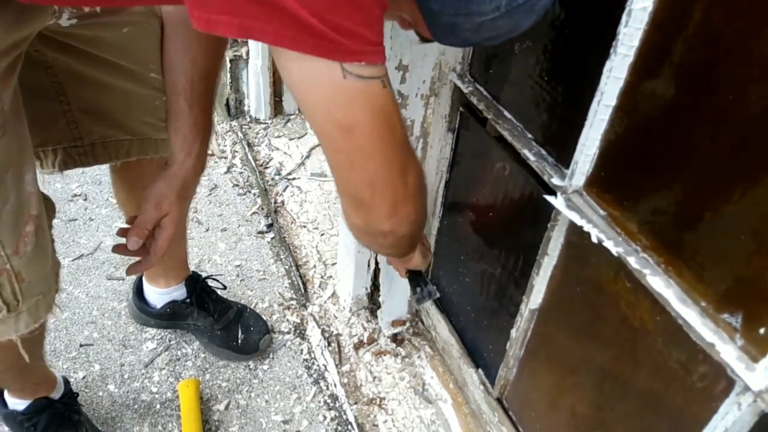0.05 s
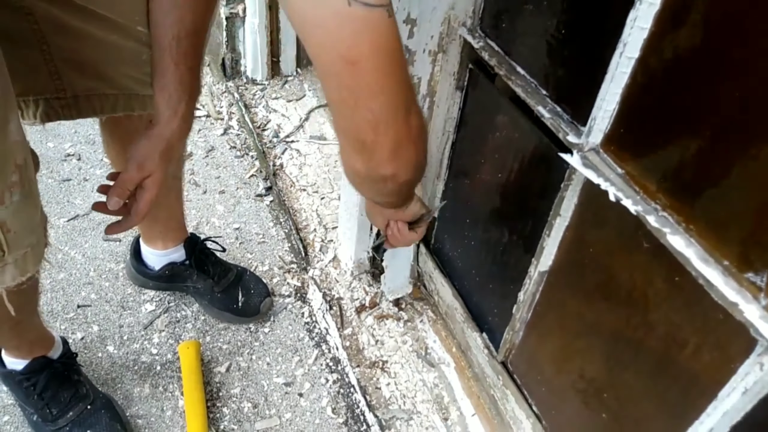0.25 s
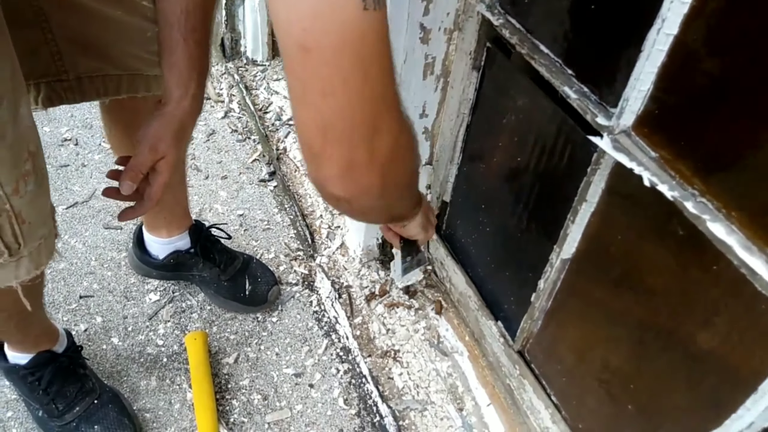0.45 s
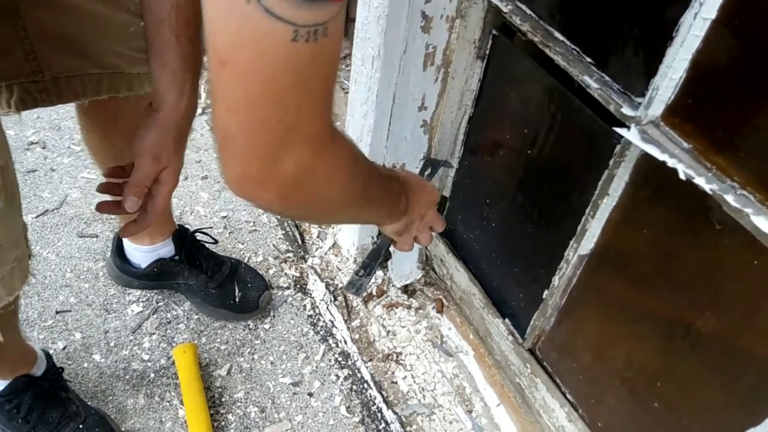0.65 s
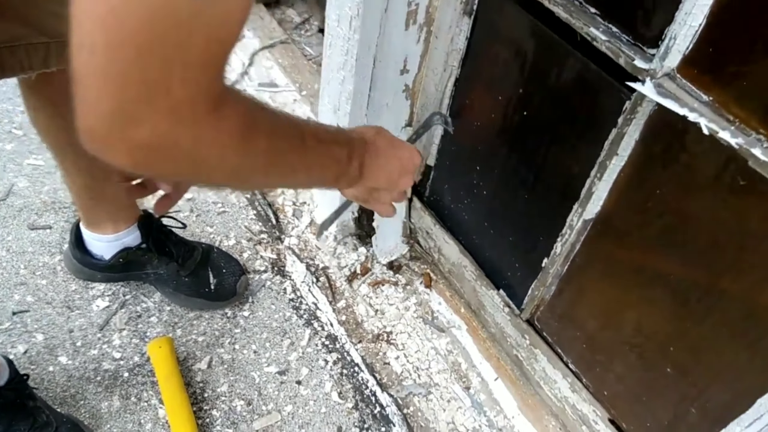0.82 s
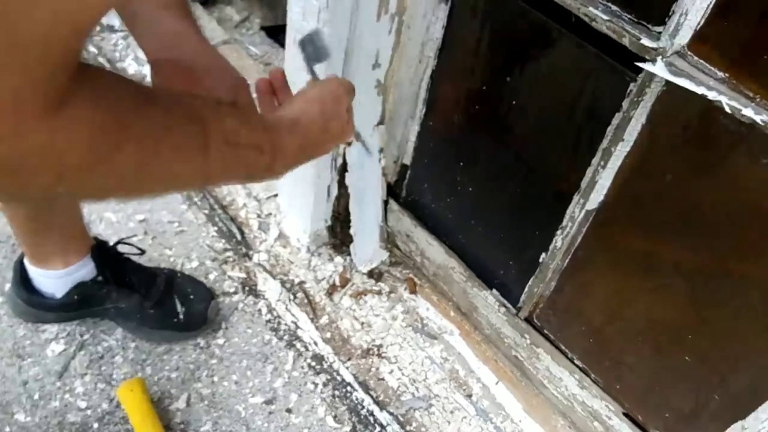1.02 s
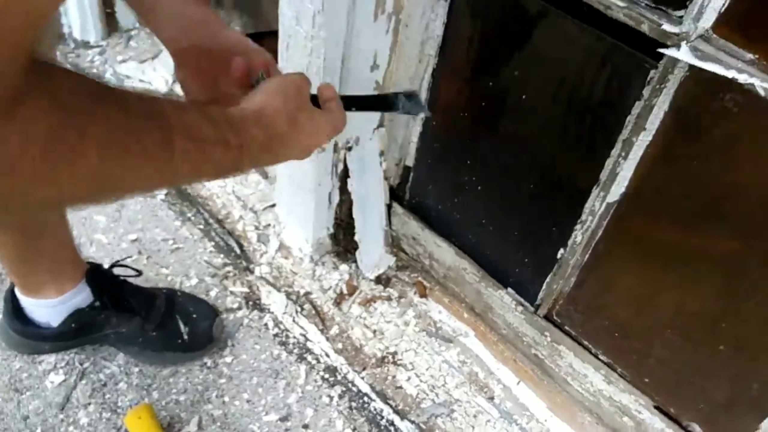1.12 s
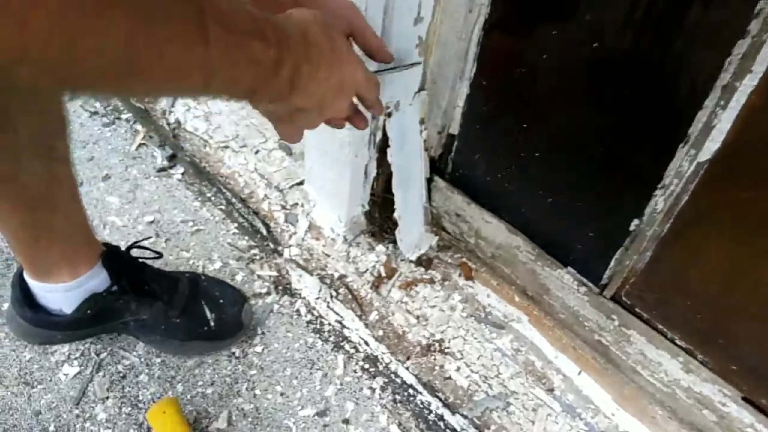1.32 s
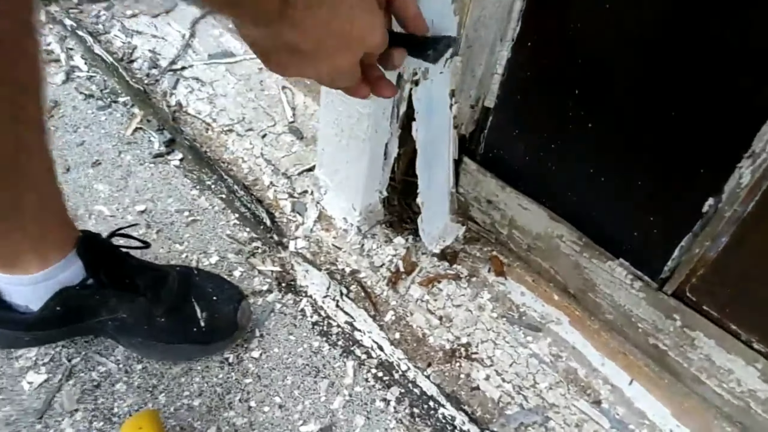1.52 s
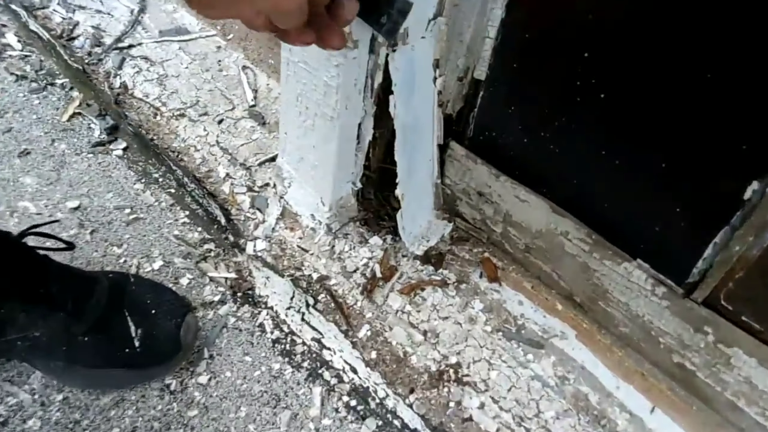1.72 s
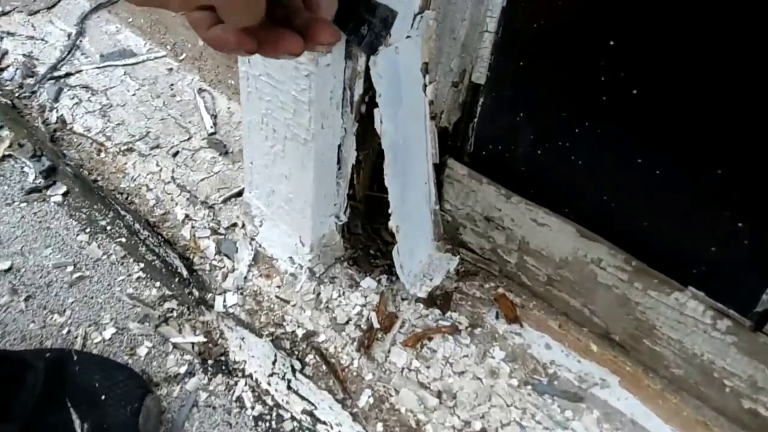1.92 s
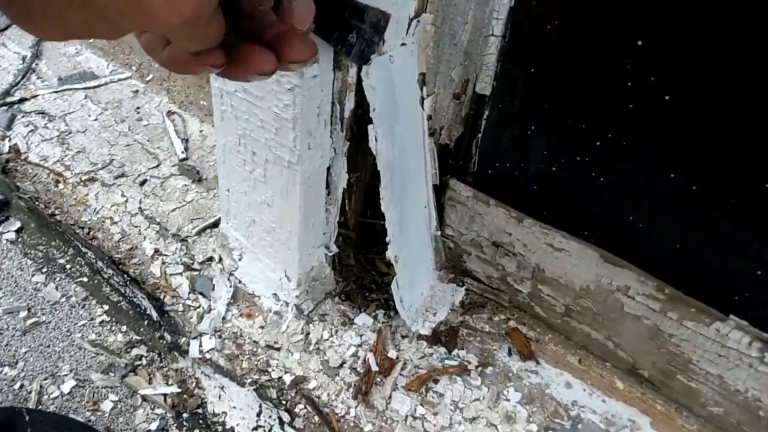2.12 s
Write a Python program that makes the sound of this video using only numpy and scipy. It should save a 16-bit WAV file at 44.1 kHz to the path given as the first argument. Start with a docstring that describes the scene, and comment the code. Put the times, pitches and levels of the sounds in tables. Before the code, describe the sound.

Close, fairly dry outdoor prying of old wood trim; it splinters sharply early on, chips tick and feet thump softly on concrete, later the frame is knocked, the blade clinks and judders briefly, over faint low air noise.

```python
"""Prying trim off an old window

A steel blade pries rotted wood off a window frame, close by, outdoors: it crumbles, then cracks sharply.
Flakes tick, shoes shuffle on concrete, the frame is knocked; the blade clinks, then judders with a short rasp.
Fading sine waves make wood and steel ring; shaped noise and random grains make the rest."""
import sys
import numpy as np
from scipy import signal
from scipy.io import wavfile

SR = 44100
rng = np.random.default_rng(int(sys.argv[2]) if len(sys.argv) > 2 else 0)


def master_out(mix):
    """Clip the mix to full scale and print it as 16-bit PCM to the path in sys.argv[1]."""
    frames = np.transpose(np.atleast_2d(mix))
    ceiling = np.clip(frames, -1, 1)
    pcm = np.round(ceiling * 32767).astype(np.int16)
    wavfile.write(sys.argv[1], SR, pcm)


N = 94815  # length in samples


def amp(db):
    """Turns decibels into a gain."""
    return 10 ** (np.asarray(db) / 20)


def unit(x):
    """Scales a sound to an rms level of 1."""
    return x / np.sqrt(np.mean(x ** 2) + 1e-20)


def seconds(length):
    """Gives the sample times of a stretch that lasts this many seconds."""
    return np.arange(int(length * SR)) / SR


def add(mix, s, sound):
    """Mixes a sound in at time s, cut off at the end of the mix."""
    start = max(round(s * SR), 0)
    part = mix[start:][:len(sound)]
    part += sound[:len(part)]


def curve(points):
    """Gain over the whole scene, drawn through (t/s, level/dB) points."""
    return amp(np.interp(np.arange(N) / SR, *np.transpose(points)))


def band(x, lo_hz, hi_hz, order=2):
    """Keeps only the sound between two frequencies."""
    edges = [lo_hz, min(hi_hz, SR / 2 - 1)]
    return signal.sosfilt(signal.butter(order, edges, "band", fs=SR, output="sos"), x)


def colour(x, points, size=2048):
    """Filters to a drawn spectrum, with energy 1 and no sound ahead of its cause (minimum phase)."""
    hz, db = np.transpose(points)
    log_bins = np.log(abs(np.fft.fftfreq(size, 1 / SR)) + 1)
    log_gain = np.log(amp(np.interp(log_bins, np.log(hz), db)))
    spectrum = np.exp(np.conj(signal.hilbert(log_gain)))
    taps = np.fft.ifft(spectrum).real[:size // 2]
    return signal.fftconvolve(x, taps / np.linalg.norm(taps))[:len(x)]


def fade(t, t60):
    """Exponential decay that drops 60 dB in t60 seconds."""
    return np.exp(-np.log(1000) * t / t60)


def onset(rise_s):
    """A short ramp that softens the start of a ring."""
    return np.minimum(seconds(.5) / rise_s, 1)


def ring(modes):
    """A struck body rings as a sum of dying sine waves, with alternating signs."""
    t = seconds(.5)
    out = 0
    for k, (hz, db, t60) in enumerate(modes):
        out = out + (-1) ** k * amp(db) * fade(t, t60) * np.sin(2 * np.pi * hz * t)
    return out


def blows(rows, spectrum, t60):
    """Each blow sheds a quick burst of noise."""
    out, t = np.zeros(N), seconds(.3)
    for s, db in rows:
        burst = rng.standard_normal(len(t)) * fade(t, t60)
        add(out, s, amp(db) * colour(burst, spectrum))
    return out


# outdoor background: [f/Hz, level/dB per Hz]
AIR = [(20, -62), (45, 1), (70, 0), (130, 3), (280, 1), (400, -4.5), (800, -8), (1700, -9.5), (3000, -16),
       (5000, -21), (7200, -21.5), (9500, -32), (15500, -28.5)]
AIR_DB, HUM_DB, HUM_HZ = -48.5, -58, 244


def air():
    """Steady noise makes the outdoor wash; a very narrow band of noise makes a faint wavering hum."""
    wash = unit(colour(rng.standard_normal(N), AIR))
    hum = unit(band(rng.standard_normal(N), HUM_HZ - 4, HUM_HZ + 4))
    return amp(AIR_DB) * wash + amp(HUM_DB) * hum


# low rumble as the stance shifts: [t/s, level/dB]
RUMBLE_LEVEL = [(.3, -54), (.55, -51), (.68, -49.5), (.75, -49), (.85, -43), (.91, -45.5), (.99, -51),
                (1.3, -64)]
# colour of the rumble: [f/Hz, level/dB per Hz]
RUMBLE = [(25, -26), (55, 1), (110, -1.5), (170, -2), (260, -7.5), (400, -22.5), (1500, -54)]


def shuffle():
    """A lumpy low rumble swells as the weight moves from foot to foot."""
    return curve(RUMBLE_LEVEL) * unit(colour(rng.standard_normal(N), RUMBLE))


# pressure of the crumbling and scuffing: [t/s, level/dB]
CRUMBLE = [(0, -55), (.05, -45), (.075, -40.5), (.115, -42), (.17, -49.5), (.23, -71), (.44, -47.5),
           (.58, -61.5), (.8, -52), (.93, -46.5), (1.09, -44), (1.2, -55), (1.53, -57), (1.62, -42.5),
           (1.85, -46), (1.98, -49), (2.05, -44), (2.15, -47.5)]
# colour of the crumbs: [f/Hz, level/dB per Hz]
CRUMBS = [(200, -12), (600, -1), (900, 2.5), (1250, -6), (1800, 3.5), (3200, -5), (5000, -9), (7400, -1.5),
          (9500, -13), (15500, -23.5)]
CRUMBS_PER_S, CRUMB_SPREAD_DB = 2500, 3


def crumbs():
    """Dense tiny fractures and grit, as random single-sample grains, follow the pressure."""
    size = amp(CRUMB_SPREAD_DB * np.minimum(rng.exponential(1, N), 4)) * rng.choice([-1, 1], N)
    grains = size * (rng.random(N) < CRUMBS_PER_S / SR)
    return curve(CRUMBLE) * unit(colour(grains, CRUMBS))


# flakes and chips that tick: [t/s, level/dB, low band/dB, middle band/dB, high band/dB]
TICKS = [(0.0138, -27, -9, -12, -4.5), (0.0525, -27, -5.5, -11, -10), (0.0698, -27.5, -9, -10, -2.5),
         (0.074, -27.5, -6, -7, -10), (0.0908, -32, -4, -20, -19), (0.112, -21, -4, -31, -9.5),
         (.1200, -29.5, -4, -8, -17), (.2970, -28.5, -2.5, -20, -23), (0.326, -31.5, -1.5, -24, -22),
         (0.4256, -18, -8, -8.5, -7.5), (0.5342, -34.5, 0.5, -13, -14), (.613, -34, -12, -11.5, -1),
         (0.7062, -24, -18, -18, -3), (0.7954, -35, -3.5, -8, -16), (.836, -35, -10, -9, -4),
         (.9170, -29.5, -4.5, -4, -9), (1.4138, -28, -1, -8, -9.5), (1.4240, -25.5, -3, -12, -14),
         (1.5046, -25.5, -3.5, -11.5, -10), (1.566, -31.5, -15, -10, -10), (1.5823, -24, -8.5, -7.5, -7),
         (1.5957, -27, -1, -10, -8), (1.665, -21, -8, -9, -2), (1.9170, -22, -19, -7.5, -9.5)]
# low, middle and high band of a tick: [from f/Hz, to f/Hz]
TICK_BANDS = [(1000, 2520), (2500, 4700), (5500, 8050)]
TICK_DB, TICK_T60, TICK_RISE_S = -1, 0.016, 0.00043
# ring of larger chips that land: [f/Hz, level/dB, t60/s]
PIP = [(1076, -40, 0.054), (1435, -35, .025), (1690, -32.5, 0.048)]
# when they land: [t/s]
PIP_S = [.444, 2.0005]


def ticks():
    """Chips of paint and wood snap and land as short noises, each with its own mix of three bands."""
    out, t = np.zeros(N), seconds(0.12)
    shape = np.minimum(t / TICK_RISE_S, 1) * fade(t, TICK_T60)
    for s, db, *shares in TICKS:
        tick = 0
        for share, edges in zip(shares, TICK_BANDS):
            tick = tick + amp(share) * unit(band(rng.standard_normal(len(t)), *edges))
        add(out, s, amp(db + TICK_DB) * shape * tick)
    for s in PIP_S:
        add(out, s, onset(TICK_RISE_S) * ring(PIP))
    return out


# fibres that part in the crack: [t/s, level/dB]
SNAPS = [(0.2363, 2), (.2376, -0.5), (.2392, -5.5), (0.2433, -10.5), (0.246, -19)]
# splintering noise of each snap: [f/Hz, level/dB per Hz]
SPLINTER = [(100, -20), (300, 0), (700, -7), (1000, -3), (2800, -2), (3600, -8), (5800, -0.5), (8000, -11),
            (11000, -17.5), (15500, -26)]
SPLINTER_DB, SPLINTER_T60 = -8, 0.018
# ring of the trim strip: [f/Hz, level/dB, t60/s]
STRIP = [(165, -20, .07), (243, -10.5, .068), (312, -12, .05), (395, -15, .045), (487, -11, .06),
         (940, -8.5, .04), (1153, -14, .05), (1380, -17, .035), (1735, -6, .032), (1882, -11.5, .036),
         (2530, -18, .028), (2850, -15, .03), (5660, -16, .03), (7505, -22, .055)]
STRIP_DB, STRIP_RISE_S = -1, 0.0011
# thin ring of the freed blade: two close tones that beat
TIP_HZ, TIP_BEAT_HZ, TIP_BEAT_SHARE = 12688, 85, .3
TIP_DB, TIP_T60 = -24.5, .15


def crack():
    """Fibres part in quick succession, the strip springs free and the blade sings with two beating tones."""
    out, t = amp(SPLINTER_DB) * blows(SNAPS, SPLINTER, SPLINTER_T60), seconds(.5)
    main_tone = np.sin(2 * np.pi * TIP_HZ * t)
    beat_tone = TIP_BEAT_SHARE * np.sin(2 * np.pi * (TIP_HZ - TIP_BEAT_HZ) * t)
    blade = amp(TIP_DB) * fade(t, TIP_T60) * (main_tone + beat_tone)
    strip = amp(STRIP_DB) * onset(STRIP_RISE_S) * ring(STRIP)
    add(out, SNAPS[0][0], blade + strip)
    return out


# crackle of the strip after the break: [f/Hz, level/dB per Hz]
SETTLE = [(60, -7), (140, 2), (450, 2), (700, -1.5), (1400, -4.5), (3000, -11), (4500, -23), (7000, -15),
          (9500, -32), (15500, -34)]
SETTLE_DB, SETTLE_T60, SETTLE_PER_S = -26.5, 0.29, 1500


def settle():
    """Small fibres keep crackling, as fading random grains, while the broken strip comes to rest."""
    out, t = np.zeros(N), seconds(.4)
    grains = unit(rng.standard_normal(len(t)) * (rng.random(len(t)) < SETTLE_PER_S / SR))
    crackle = colour(grains * fade(t, SETTLE_T60), SETTLE)
    add(out, SNAPS[2][0], amp(SETTLE_DB) * crackle)  # starts with the third snap
    return out


# soft low thumps, the heave after the crack and then the feet:
# [t/s, level/dB, f/Hz, time to the peak of the swell/s]
THUMPS = [(.258, -37.5, 90, 0.009), (0.294, -38, 172, 0.0083), (0.477, -42, 139.5, 0.0096),
          (0.515, -33.5, 98, 0.0068), (.625, -37.5, 109, 0.014), (0.784, -39, 120, 0.012),
          (.825, -41.5, 175, 0.017), (.950, -42.5, 120, 0.0086), (1.661, -36.5, 339, 0.0064),
          (1.723, -41.5, 136, 0.0089), (1.945, -42, 294, 0.0041), (2.011, -35.5, 177, 0.0064)]
THUMP_SCUFF = 0.56  # gain of the scuff beside the bump


def thumps():
    """Soft low thumps, first the heave after the crack, then the feet: a low bump with a little scuff."""
    out, t = np.zeros(N), seconds(0.38)
    for s, db, hz, peak_s in THUMPS:
        scuff = unit(band(rng.standard_normal(len(t)), hz / 2, hz * 2))
        bump = np.sin(2 * np.pi * hz * t) + THUMP_SCUFF * scuff
        swell = t / peak_s * np.exp(1 - t / peak_s)
        add(out, s, amp(db) * swell * bump)
    return out


# knocks on the frame: [t/s, level/dB]
KNOCKS = [(.2965, -13), (1.354, -2), (1.3583, 0.5), (1.3665, -9), (1.386, -9.5)]
# dull noise of a knock: [f/Hz, level/dB per Hz]
THUD = [(100, -19), (500, 4), (1200, -4), (3000, -22), (8000, -25), (15000, -48)]
THUD_DB, THUD_T60 = -23.5, 0.054
# ring of the frame: [f/Hz, level/dB, t60/s]
FRAME = [(200, -17.5, .042), (390, -25, .04), (455, -20, .055), (590, -22, .03), (930, -24, .035),
         (1645, -34, .07), (2200, -36, .025), (6855, -37, .05), (7700, -34, .025)]
FRAME_S, FRAME_DB, FRAME_RISE_S = 1.354, 2.5, 0.002


def knock():
    """Dull knocks land on the frame; a hand's strong group of knocks sets it ringing once."""
    out = amp(THUD_DB) * blows(KNOCKS, THUD, THUD_T60)
    add(out, FRAME_S, amp(FRAME_DB) * onset(FRAME_RISE_S) * ring(FRAME))
    return out


# short dry scrapes: [middle t/s, half length/s, level/dB]
SCRAPES = [(0.506, 0.011, -47), (1.119, 0.015, -30.5), (1.741, 0.013, -26.5), (2.072, .014, -44),
           (2.089, .003, -37), (2.096, 0.0052, -31), (2.110, 0.0074, -29.5), (2.123, 0.0034, -36),
           (2.133, 0.0022, -37)]
# colour of a scrape: [f/Hz, level/dB per Hz]
SCRAPE = [(300, -19.5), (900, -7), (1300, 0.5), (1750, 3), (2700, -5.5), (5200, 3.5), (7800, 1), (9000, -5),
          (15500, -21)]
# wood and steel rung by the grains: [f/Hz, level/dB, t60/s]
SCRAPE_MODES = [(855, 2.5, .06), (1687, 3, 0.063), (2140, -18, 0.08), (4700, 0, 0.051), (6040, -11, 0.047),
                (6600, 9.5, 0.051)]
SCRAPE_GRAINS_PER_S, SCRAPE_SPREAD_DB, SCRAPE_RING_DB = 2500, 2.5, -7.5


def scrapes():
    """Brief gritty slides over dry paint swell and die, ringing wood and steel."""
    t = np.arange(N) / SR
    stroke = sum(amp(db) * np.exp(-((t - s) / half) ** 2) for s, half, db in SCRAPES)
    size = amp(SCRAPE_SPREAD_DB * np.minimum(rng.exponential(1, N), 3)) * rng.choice([-1, 1], N)
    grains = stroke * unit(size * (rng.random(N) < SCRAPE_GRAINS_PER_S / SR))
    body = ring(SCRAPE_MODES)
    ringing = signal.fftconvolve(grains, body / np.linalg.norm(body))[:N]
    return colour(grains, SCRAPE) + amp(SCRAPE_RING_DB) * ringing


# a small clear ting as the blade is lifted: [f/Hz, level/dB, t60/s]
TING = [(5760, -45, 0.046), (7080, -33, 0.045), (10300, -46, 0.047)]
TING_S = .7735
# the blade slides in and sings faintly
SLIDE_S, SLIDE_HALF_S, SLIDE_DB = 1.655, 0.048, -40
# the blade touches the wood: [t/s, level/dB]
CLINKS = [(1.585, -26), (1.6428, 5)]
# ring of the blade: [f/Hz, level/dB, t60/s]
BLADE = [(1577, -43, .12), (2370, -42, .15), (3548, -42, .09), (4990, -29, .09), (5750, -27, .05),
         (5880, -28, .07), (5980, -27, .1), (6193, -21.5, .105), (6453, -20, .07), (6803, -25, .07),
         (7770, -28, .06), (8400, -30, .075)]
CLINK_RISE_S, CLINK_DB = .003, 0
# grit at the edge of the blade: [f/Hz, level/dB per Hz]
CHATTER = [(1000, -17), (4300, -15), (5200, -1), (6300, -1), (8300, -8), (9500, -23), (11700, -20),
           (15500, -30)]
CHATTER_DB, CHATTER_T60 = -25, .08


def clinks():
    """The blade tings when lifted, rings and chatters as it meets the wood, and sings as it slides in."""
    t, steel = seconds(.5), ring(BLADE)
    slide = np.exp(-((np.arange(N) / SR - SLIDE_S) / SLIDE_HALF_S) ** 2)
    singing = unit(signal.fftconvolve(rng.standard_normal(N), steel)[:N])
    out = amp(SLIDE_DB) * slide * singing
    for s, db in CLINKS:
        chatter = colour(rng.standard_normal(len(t)) * fade(t, CHATTER_T60), CHATTER)
        clink = amp(CLINK_DB) * steel + amp(CHATTER_DB) * chatter
        add(out, s, amp(db) * onset(CLINK_RISE_S) * clink)
    add(out, TING_S, ring(TING))
    return out


# force on the blade as it judders through the wood: [t/s, level/dB]
PUSH = [(1.69, -29.5), (1.709, -18.5), (1.715, -9.5), (1.72, -12.5), (1.723, -4.5), (1.734, -6),
        (1.744, -8.5), (1.755, -11), (1.761, -16.5), (1.771, -53)]
SLIPS_PER_S = 620  # one over the middle (median) gap
SLIP_JITTER, SLIP_SPREAD_DB = .5, 3.5
# click of each slip: [f/Hz, level/dB per Hz]
SLIP = [(100, -36), (450, -6), (800, -0.5), (2000, -2.5), (4600, -6), (5600, -10.5), (7800, -4.5),
        (9000, -16), (12000, -27), (15500, -47)]
SLIP_DB, SLIP_GRIT_DB, SLIP_T60 = -1, -30, .0015
# fibres that splinter during the judder, as sharp clicks: [t/s, level/dB]
TEARS = [(1.7136, -8), (1.7158, -7), (1.7226, -0.5), (1.7238, -2.5), (1.7283, -1.5), (1.7297, -2),
         (1.7346, -2.5), (1.7366, -7)]
TEAR_DB, TEAR_RING_DB = -2.5, -3
# resonances of the wedged strip: [f/Hz, level/dB]
WEDGED = [(420, -38), (720, -25.5), (768, -26), (1000, -24), (1112, -22), (1432, -30), (1570, -32),
          (1750, -30), (1828, -25), (2345, -24), (2463, -26), (2894, -27), (3032, -31), (3230, -29),
          (3497, -31), (3886, -30), (4095, -30), (4598, -27), (6680, -37), (7410, -35), (8110, -35)]
WEDGED_DB, WEDGED_T60 = 1.5, .048


def rasp():
    """The blade sticks and slips unevenly; tiny crunches and splintering fibres ring the wedged strip."""
    times, db = np.transpose(PUSH)
    force = amp(np.interp(np.arange(N) / SR, times, db, left=-120, right=-120))
    gap, size = rng.standard_normal((200, 2)).T
    at = times[0] + np.cumsum(np.exp(SLIP_JITTER * gap)) / SLIPS_PER_S
    slips, tears = np.zeros((2, N))
    slips[np.minimum((at * SR).astype(int), N - 1)] = amp(SLIP_SPREAD_DB * np.minimum(size, 1))
    for s, tear_db in TEARS:
        add(tears, s, amp([tear_db]))  # a single-sample click

    puff = fade(seconds(.02), SLIP_T60)
    puffs = signal.fftconvolve(slips, puff / np.linalg.norm(puff))[:N]
    crunch = (puffs + amp(SLIP_GRIT_DB)) * rng.standard_normal(N)
    clicks = colour(amp(SLIP_DB) * force * crunch + amp(TEAR_DB) * tears, SLIP)

    strip = ring([(hz, mode_db, WEDGED_T60) for hz, mode_db in WEDGED])
    body = signal.fftconvolve(force * slips + amp(TEAR_RING_DB) * tears, strip)[:N]
    return clicks + amp(WEDGED_DB) * body


# scatter from walls and ground: [f/Hz, level/dB, t60/s]
YARD = [(147, -30, 0.3), (386, -29.5, 0.25), (1030, -31, 0.25), (2450, -27.5, 0.08), (6450, -22.5, 0.086),
        (12900, -32, 0.12)]


def yard(x, rise_s=0.014):
    """Diffuse reflections: bands of noise smear the sound, each dying at its own speed."""
    t, tail = seconds(.5), 0
    for hz, db, t60 in YARD:
        noise = band(rng.standard_normal(len(t)), hz / 1.74, hz * 1.59)
        part = noise * fade(t, t60) * np.minimum(t / rise_s, 1)
        tail = tail + amp(db) * part / np.linalg.norm(part)
    return signal.fftconvolve(x, tail)[:N]


def scene():
    """All the work at the window, its reflections, the low thumps and the background."""
    work = ticks() + crack() + settle() + knock() + scrapes() + clinks() + rasp()
    return (air() + shuffle() + crumbs() + thumps() + work + yard(work))[None]


CEILING, LOW_CUT_HZ, EDGE_HZ = .95, 49, 15600


def record(dry):
    """The loudest peaks are rounded off; then the deep bass and the highest treble are cut."""
    rounded = CEILING * np.tanh(dry / CEILING)
    low_cut = signal.butter(2, LOW_CUT_HZ, "high", fs=SR, output="sos")
    thinned = signal.sosfilt(low_cut, rounded)
    treble_cut = signal.firwin(511, EDGE_HZ, window=("kaiser", 9), fs=SR)
    return signal.oaconvolve(thinned, treble_cut[None], "same")


dry = scene()
out = record(dry)
master_out(out)
```